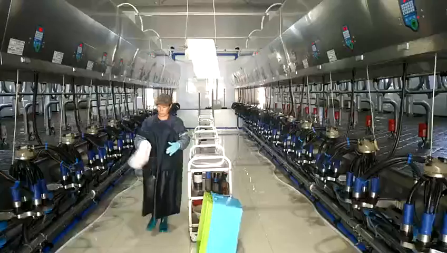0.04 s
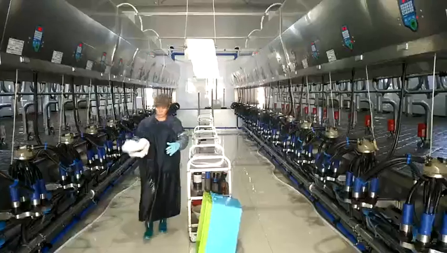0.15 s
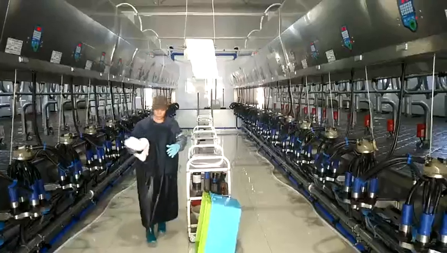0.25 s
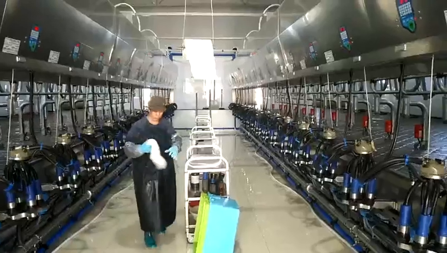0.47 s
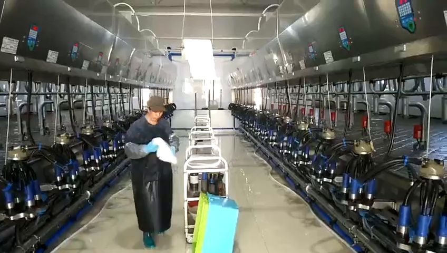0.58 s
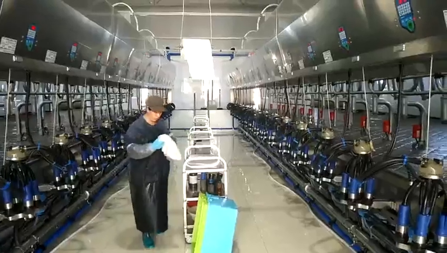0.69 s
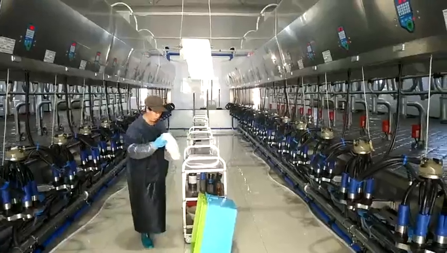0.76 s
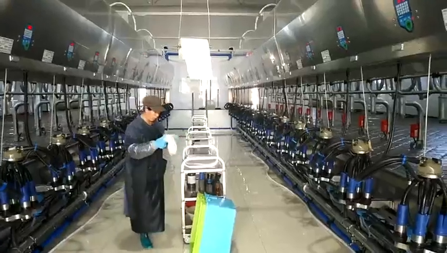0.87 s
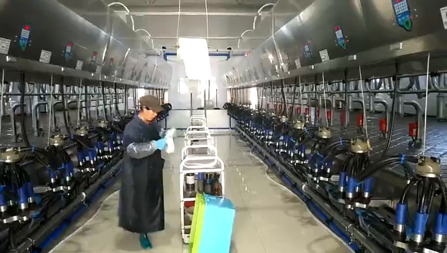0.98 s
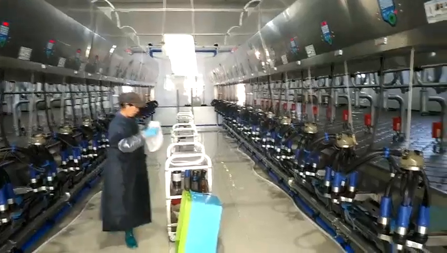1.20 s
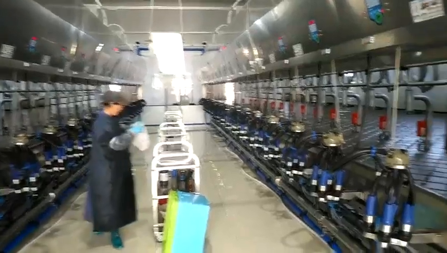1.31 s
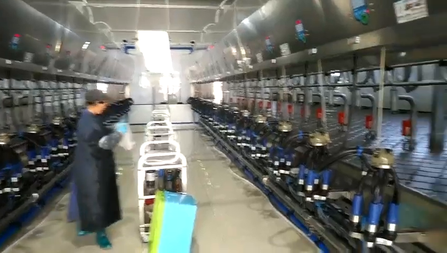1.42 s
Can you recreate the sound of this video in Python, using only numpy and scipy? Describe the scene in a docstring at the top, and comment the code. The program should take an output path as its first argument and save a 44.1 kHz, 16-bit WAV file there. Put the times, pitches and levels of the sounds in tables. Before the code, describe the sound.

Near silence until 0.12 s, when a faint steady hiss and low throbbing hum open abruptly. A rush of air through pipes swells with a hollow gliding drone, strongest at 0.4-0.6 s. A sharp tick at 0.6 s and dull knocks around 0.62-0.71 s accompany its sudden collapse and a thin treble spray. Quiet hiss and sagging hum remain, with sparse ticks and soft knocks; the lower midrange swells slightly near 1.37 s.

```python
"""Air rush in a milking parlor

Machinery runs in a long, hard-walled hall: filtered noise makes a steady hiss, a harmonic series a low hum.
The sound sets in abruptly; a rush of air, noise through pipe resonances, swells with a gliding sine drone
and falls away within a tenth of a second. Decaying sines make dull knocks; short noise bursts with an echo
make light ticks. A thin spray of treble passes as the rush dies, and the lower midrange swells at the end."""
import sys
import numpy as np
from scipy import signal
from scipy.io import wavfile

SR = 44100
rng = np.random.default_rng(int(sys.argv[2]) if len(sys.argv) > 2 else 0)


def wav_out(sig):
    """Save sig, one row per channel (or a flat mono array), as 16-bit PCM at SR to the path in sys.argv[1]."""
    wavfile.write(sys.argv[1], SR, np.round(np.clip(np.atleast_2d(sig).T, -1, 1) * 32767).astype(np.int16))


N = 63945
T = np.arange(N) / SR   # time in s


def from_db(db):
    """Logarithmic level: decibels become an amplitude gain."""
    return 10 ** (np.asarray(db) / 20)


def rms_one(x):
    """Power normalisation: the root mean square becomes 1."""
    return x / np.sqrt(np.mean(x ** 2) + 1e-20)


def in_time(rows):
    """Linear interpolation: every column after the time column, at each sample."""
    times_s, *columns = np.transpose(rows)
    return [np.interp(T, times_s, column) for column in columns]


def drift(rate_hz):
    """Low-passed random process: white noise through two equal real poles, rms 1."""
    step = 40   # samples between the computed points
    pole = np.exp(-2 * np.pi * rate_hz * step / SR)
    white = rng.standard_normal(N // step + 2002)
    slow = signal.lfilter([1], [1, -2 * pole, pole * pole], white)[2000:]   # settled part
    return np.interp(np.arange(N) / step, np.arange(len(slow)), rms_one(slow))


def banded_noise(spectrum, patchy_db):
    """Third-octave synthesis: noise bands, each with its own level fluctuation, sum to rms 1."""
    hz, density_db = np.transpose(spectrum)
    edges = 28 * 2 ** (np.arange(28) / 3)
    white = rng.standard_normal((2, N + SR // 4))   # neighbouring bands use different noise
    out = 0
    for k, (low, high) in enumerate(zip(edges, edges[1:])):
        sos = signal.butter(3, [low, high], "band", fs=SR, output="sos")
        band = signal.sosfilt(sos, white[k % 2])[-N:]
        centre_db = np.interp(np.log(low * high) / 2, np.log(hz), density_db)
        out = out + band * from_db(centre_db + patchy_db * drift(11.3))
    return rms_one(out)


def high_pass(x, hz):
    """High-pass filtering: the spectrum below the corner is attenuated."""
    return signal.sosfilt(signal.butter(4, hz, "high", fs=SR, output="sos"), x)


def resonances(rows):
    """Resonance under broadband excitation: noise through narrow, steep-sided bands."""
    out = 0
    for hz, width, level_db in rows:
        sos = signal.butter(2, [hz - width / 2, hz + width / 2], "band", fs=SR, output="sos")
        band = signal.sosfilt(sos, rng.standard_normal(N + SR))[-N:]
        out = out + from_db(level_db) * rms_one(band)
    return out


def swell(level, colour):
    """Amplitude modulation: noise of one colour follows a level curve."""
    level_db, = in_time(level)
    return from_db(level_db) * banded_noise(colour, patchy_db=0.5)


# spectrum of the steady machinery noise: pitch_hz, relative density_db (per Hz)
HISS_COLOUR = [(65, -12.5), (110, -1.5), (162, -10), (190, -9.5), (363, -12), (385, -16), (453, -17),
               (751, -23.5), (1130, -21.5), (1320, -23.5), (1490, -25), (2110, -27), (2380, -20),
               (2910, -28), (3350, -23), (4540, -24), (13800, -70.5)]
HISS_DB, HISS_PATCHY_DB = -48, 2.4
# hollow resonances of the hall: pitch_hz, width_hz, level_db
HALL_TONES = [(372.3, 39, -60), (412.3, 20, -61.5), (616, 18, -68.5), (2314, 150, -66.5),
              (2840, 130, -66.5)]


def steady_hiss():
    """Room modes: even machinery noise is joined by noise in the hall's resonances."""
    machinery = from_db(HISS_DB) * banded_noise(HISS_COLOUR, patchy_db=HISS_PATCHY_DB)
    return machinery + resonances(HALL_TONES)


# sagging fundamental of the hum: time_s, pitch_hz
HUM_PITCH = [(.125, 87.9), (.4, 88.24), (.66, 87.1), (.74, 80.24), (.88, 78.43), (1.0, 76.84), (1.25, 74.4),
             (1.45, 72.9)]
# throbbing level of the hum: time_s, level_db
HUM_LEVEL = [(0.13, -57.5), (0.224, -39), (0.258, -53.5), (0.356, -34), (0.468, -52.5), (0.5, -43.5),
             (0.522, -50), (0.548, -35), (0.606, -33.5), (0.64, -48), (0.67, -28.5), (0.688, -35),
             (0.71, -51), (0.784, -36.5), (0.816, -49), (0.838, -38), (0.88, -32), (0.938, -44.5),
             (0.968, -29.5), (0.99, -32), (1.04, -57), (1.082, -38.5), (1.184, -59), (1.258, -45.5),
             (1.394, -64), (1.434, -45), (1.45, -42.5)]
# harmonics of the hum: multiple of the fundamental, level_db (against the hum level)
HUM_ORDERS = [(1, 0.5), (2, -14), (3, -24)]
HUM_WANDER_HZ = 1.56   # rms random deviation of the fundamental


def hum():
    """Harmonic series: a low fundamental and weak overtones share one wandering phase."""
    pitch_hz, = in_time(HUM_PITCH)
    level_db, = in_time(HUM_LEVEL)
    phase = 2 * np.pi * np.cumsum(pitch_hz + HUM_WANDER_HZ * drift(19.6)) / SR
    out = 0
    for multiple, order_db in HUM_ORDERS:
        out = out + from_db(level_db + order_db) * np.sin(round(multiple) * phase)
    return np.sqrt(2) * out


# strength of the rush of air: time_s, level_db
FLOW = [(.125, -100), (.175, -50), (.25, -42.5), (.36, -35.5), (.45, -35), (.54, -36.5), (.625, -33.5),
        (.655, -44), (.685, -40), (.72, -54.5), (.79, -61), (.9, -118)]
# spectrum of the turbulence: pitch_hz, relative density_db (per Hz)
RUSH_COLOUR = [(35, -15), (60, -3), (90, -2), (125, -0.5), (200, 2.5), (300, 2.5), (370, -6), (500, -8.5),
               (650, -8), (850, -12), (1250, -10), (1600, -15.5), (2000, -15), (2500, -8), (2900, -14),
               (3350, -16), (4100, -11.5), (5500, -20), (7000, -31), (8500, -41.5), (10500, -46.5),
               (13500, -50)]
RUSH_DB, RUSH_PATCHY_DB = 3.5, 2   # turbulence against the flow; rms flicker of each band
# pipe resonances: pitch_hz, width_hz, level_db (against the flow)
PIPES = [(179.5, 10, -10.5), (226.5, 7.9, -6), (406.2, 8.5, -12), (448, 17, -17), (589.4, 22, -20),
         (627, 27, -20.5), (823, 13, -23), (1157, 7.6, -22), (1324, 12, -25.5), (2352, 15, -19),
         (2670, 35, -23), (2730, 18.4, -16.5), (2937, 35, -17.5)]


def air_rush():
    """Flow noise with pipe resonance: turbulence and the modes it excites rise and fall together."""
    flow_db, = in_time(FLOW)
    turbulence = rms_one(high_pass(banded_noise(RUSH_COLOUR, patchy_db=RUSH_PATCHY_DB), hz=43.4))
    return from_db(flow_db) * (from_db(RUSH_DB) * turbulence + resonances(PIPES))


# gliding tone in the pipe: time_s, pitch_hz, level_db
DRONE = [(.125, 263.7, -53.5), (.2, 261, -45.5), (.28, 268.8, -39), (.39, 268.6, -36), (.45, 265.8, -31),
         (.51, 262.2, -30), (.565, 257.8, -27.5), (.625, 264, -33.5), (.665, 253, -86), (.75, 259.8, -82)]
DRONE_WAVER_DB = -0.5   # the sign only inverts the random waver


def drone():
    """Frequency modulation: one strong pipe tone, a sine of gliding pitch, builds up during the rush."""
    pitch_hz, level_db = in_time(DRONE)
    phase = 2 * np.pi * np.cumsum(pitch_hz) / SR
    return from_db(level_db + DRONE_WAVER_DB * drift(27)) * np.sqrt(2) * np.sin(phase)


def ring(clicks, hz, t60):
    """Damped oscillator: a unit click starts a decaying sine of initial height 1."""
    radius, angle = np.exp(-np.log(1000) / (t60 * SR)), 2 * np.pi * hz / SR
    feedback = [1, -2 * radius * np.cos(angle), radius * radius]
    return signal.lfilter([0, np.sin(angle)], feedback, clicks + 1e-18)


ROOM_T60_S = 0.19


def room(x):
    """Diffuse reverberation: convolution with exponentially dying noise of unit energy."""
    tail = rng.standard_normal(N) * np.exp(-np.log(1000) * T / ROOM_T60_S)
    return signal.fftconvolve(x, tail / np.linalg.norm(tail))[:N]


# clacks and ticks of the fittings: start_s, level_db (energy of the direct body), pitch_hz
TICKS = [(0.2054, -23.5, 4400), (0.3735, -16.5, 4992), (0.4283, -18, 4940), (0.447, -18, 5296),
         (0.6047, -9.5, 4240), (0.8738, -33.5, 5600), (1.1046, -21, 5450), (1.158, -29, 5300),
         (1.2024, -32, 4850), (1.3725, -26.5, 4640), (1.4445, -23, 5590)]
TICK_CONTACT_S = .003   # time for the scrape to fall to 1/e
TICK_WIDTH = .28   # half the body's bandwidth, as a share of its pitch
RING_HZ, RING_T60_S = 6390, .02   # the faint metallic ring that all ticks share
RING_DB = -14.5   # before weighting by contact time over ring time
TICK_ROOM_DB = -4   # whole tick into the echo
SHIMMER_HZ, SHIMMER_DB = 7360, 0   # extra echo of the brightest part


def ticks():
    """Impact noise: short rough contacts, each band-limited, ring faintly and echo in the hall."""
    direct = np.zeros(N)
    for start_s, level_db, pitch_hz in TICKS:
        envelope = (T >= start_s) * np.exp(-np.abs(T - start_s) / TICK_CONTACT_S)
        scrape = rng.standard_normal(N) * envelope
        band = [pitch_hz * (1 - TICK_WIDTH), pitch_hz * (1 + TICK_WIDTH)]
        sos = signal.butter(4, band, "band", fs=SR, output="sos")
        body = signal.sosfilt(sos, scrape + 1e-18)
        direct += from_db(level_db) * body / np.linalg.norm(body)
    ringing = from_db(RING_DB) * ring(direct, RING_HZ, RING_T60_S) * TICK_CONTACT_S / RING_T60_S
    shimmer = from_db(SHIMMER_DB) * high_pass(direct, hz=SHIMMER_HZ)
    return direct + ringing + room(from_db(TICK_ROOM_DB) * direct) + room(shimmer)


# thin treble as the rush dies away: time_s, level_db
SPRAY_LEVEL = [(.56, -89), (.62, -59), (.68, -48), (.715, -55.5), (.75, -79), (.85, -100)]
# its spectrum: pitch_hz, relative density_db (per Hz)
SPRAY_COLOUR = [(2500, -45), (4500, -6), (5400, 1), (6500, -8.5), (8500, -19), (10500, -30.5),
                (13500, -30.5)]


def treble_spray():
    """Shaped noise: a thin spray of treble comes and goes as the rush dies away."""
    return swell(SPRAY_LEVEL, SPRAY_COLOUR)


# dull knocks: start_s, pitch_hz, level_db (before the attack), t60_s
KNOCKS = [(.618, 345.6, -33.5, 0.24), (.656, 90.2, -31, 0.091), (0.664, 155, -20.5, 0.059),
          (0.689, 403.6, -39.5, 0.23), (.706, 646, -40.5, 0.13), (.712, 782, -36.5, 0.079),
          (.775, 367, -44, 0.18), (.88, 272.5, -42.5, 0.26), (1.15, 381, -43.5, 0.21),
          (1.298, 251, -39, 0.071)]
KNOCK_ATTACK_S = 0.004   # time constant of the onset


def knocks():
    """Modal decay: each soft blow is one exponentially damped sine, a short hollow note."""
    out = 0
    for start_s, pitch_hz, level_db, t60_s in KNOCKS:
        age = np.maximum(T - start_s, 0)
        attack = 1 - np.exp(-age / KNOCK_ATTACK_S)
        decay = np.exp(-np.log(1000) * age / t60_s)
        out = out + from_db(level_db) * attack * decay * np.sin(2 * np.pi * pitch_hz * age)
    return out


# lower midrange, which swells at the end: time_s, level_db
MIDRANGE_LEVEL = [(1.1, -69), (1.23, -62), (1.3, -62.5), (1.37, -54), (1.45, -57.5)]
# its spectrum: pitch_hz, relative density_db (per Hz)
MIDRANGE_COLOUR = [(300, -23), (450, -14), (620, -0.5), (1000, -2), (1500, -15), (3000, -39)]


def midrange_swell():
    """Shaped noise: the lower midrange, faint at first, swells at the end."""
    return swell(MIDRANGE_LEVEL, MIDRANGE_COLOUR)


def scene():
    """Superposition: the pressures of all sources add at one microphone."""
    background = steady_hiss() + hum() + midrange_swell()
    pipework = air_rush() + drone() + treble_spray()
    return (background + pipework + ticks() + knocks())[None]


START_S, OPEN_S = .124, .004   # silence before the onset; length of the fade-in
CUTOFF_HZ = 13950


def record(dry):
    """Gating and band limitation: the sound opens abruptly and a steep low-pass cuts the top."""
    opened = dry * np.clip((T - START_S) / OPEN_S, 0, 1)
    # ripple of .2 dB below the cutoff, 80 dB of rejection above
    sos = signal.ellip(10, .2, 80, CUTOFF_HZ, fs=SR, output="sos")
    return signal.sosfilt(sos, opened)


dry = scene()
out = record(dry)
wav_out(out)
```